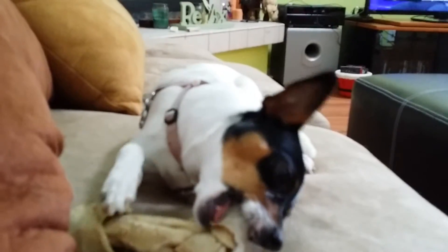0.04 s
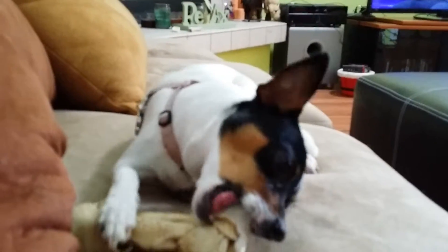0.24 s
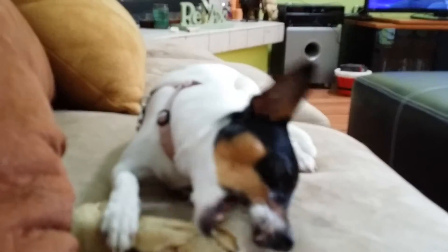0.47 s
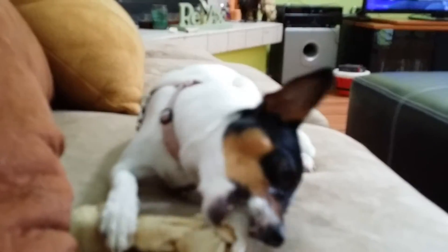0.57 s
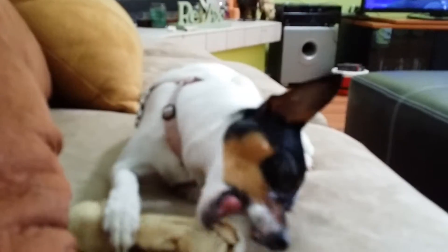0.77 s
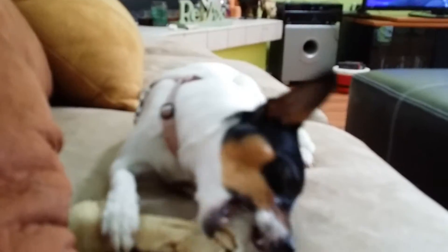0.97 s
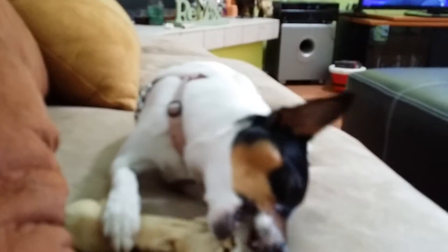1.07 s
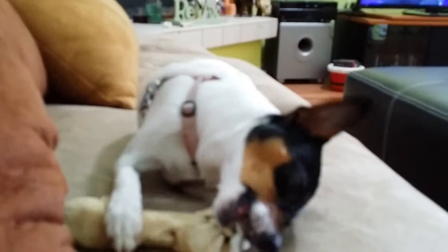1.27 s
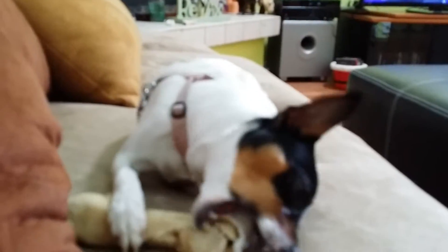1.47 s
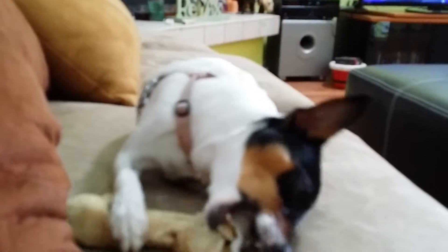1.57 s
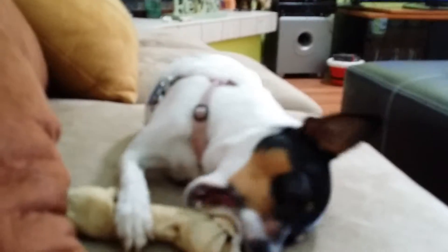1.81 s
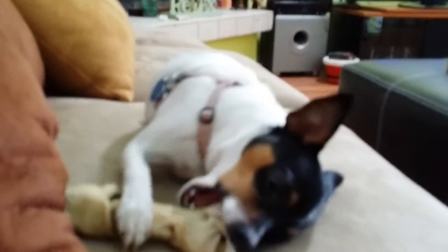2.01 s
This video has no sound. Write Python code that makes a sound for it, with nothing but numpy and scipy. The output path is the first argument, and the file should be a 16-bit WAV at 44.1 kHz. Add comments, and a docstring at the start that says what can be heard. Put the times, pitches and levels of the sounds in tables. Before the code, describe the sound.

A small dog gnaws rawhide close by in a quiet furnished room; harness metal pings early, a sniff-like hiss puffs, crunches cluster around half a second and one second, then only sparse faint ticks.

```python
"""Teeth crack and tick on a rawhide bone as a small dog gnaws it on a sofa, close by and a little right.
Cracks ring short modes of hide and mouth; hard bites add hollow knocks and lips add thin clicks.
Jaw and tongue make soft bumps that fall in pitch; filtered noise and low thuds make the cushion rumble.
A dry hiss, probably the dog's sniffing nose, swells and fades; harness fittings clink as decaying tones
and narrow noise. Chewing excites a short room tail; quiet room air and a low hum lie beneath."""
import sys
import numpy as np
from scipy import signal
from scipy.fft import rfft, irfft
from scipy.io import wavfile

SR = 44100
rng = np.random.default_rng(int(sys.argv[2]) if len(sys.argv) > 2 else 0)


def to_wav(sig):
    """Store sig (one row per channel, or 1-D mono) as 16-bit WAV at the path in sys.argv[1].

    Samples outside -1..1 are clipped; the rate is SR.
    """
    pcm = np.clip(np.atleast_2d(sig), -1, 1) * 32767
    pcm = np.round(pcm).astype(np.int16)
    wavfile.write(sys.argv[1], SR, pcm.T)  # frames by channels


N = 90404
TIME = np.arange(N) / SR

# Every *_PAN_DB is the left level over the right; every *_ALIKE is the left-right correlation.
# Every spectrum gives relative levels: (frequency [Hz], level [dB]).

# teeth on the hide, before the group trims:
# (time [s], level around 3 kHz [dB], level around 6 kHz [dB], level around 11 kHz [dB])
CRACKS = [(0.3174, -71, -45, -36), (0.3509, -57, -46, -39.5), (0.4725, -54, -39, -58),
          (0.474, -54, -44.5, -53), (0.4907, -48, -46, -48), (0.5087, -46, -45, -54),
          (0.5497, -38, -42, -65), (0.5542, -45.5, -42, -63), (0.558, -41.5, -55, -47.5),
          (0.733, -49, -35, -47.5), (0.7935, -44, -47, -49), (0.8124, -49.5, -60, -48),
          (0.9309, -37, -33, -36), (0.9908, -42, -53, -48), (1.0182, -36, -44.5, -62),
          (1.064, -31.5, -39, -39), (1.0683, -32, -36.5, -34), (1.0736, -47, -35, -46),
          (1.078, -30.5, -33, -38), (1.097, -44, -58, -70), (1.1169, -47, -37, -50),
          (1.1213, -35.5, -36.5, -48), (1.126, -47, -51, -46), (1.2483, -52.5, -69, -50),
          (1.27, -50, -59, -69), (1.276, -61, -65, -62), (1.284, -57, -56, -66), (1.377, -54, -49.5, -60),
          (1.5616, -54.5, -53.5, -59.5), (1.575, -51, -65, -77), (1.664, -49.5, -65, -68),
          (1.723, -54, -66, -57.5), (1.732, -57, -58, -56.5), (1.8283, -56, -78, -63.5),
          (2.0073, -40, -40, -47.5), (2.0134, -45, -51, -70)]
# resonances of the hide, one group per crack level, lowest mode first:
# (frequency [Hz], 60 dB decay [s], relative left level [dB], relative right level [dB])
HIDE_MODES = [
    [(2560, 0.0037, -6, -2), (2840, 0.0073, -17, -17), (3460, 0.0035, -21, 3)],
    [(4660, 0.002, -22, 9), (6000, 0.0034, 1, 4), (7010, 0.0025, -5, 8)],
    [(8190, 0.0019, 2, 7), (10700, 0.0021, -12.5, 2), (12770, 0.0054, -19, -8)],
]
# trim of each group of hide modes: (level [dB])
GROUP_TRIMS = [-0.5, 1, 2.5]
HIT_LEVEL_S = 0.004  # cracks, knocks and smacks carry the energy of their rms level held this long
SKIRT_SHARE = 0.9  # high-pass of a group, as a share of its lowest mode
DETUNE = 0.02  # greatest random shift of a mode, as a share of its frequency
SPLINTER_FADE_S, SPLINTER_DB, SPLINTERS_PER_S = 0.0018, -5, 5000  # level relative to the snap

# hard bites that ring the mouth: (time [s], level [dB], frequency [Hz])
KNOCKS = [(0.35, -52, 1900), (0.455, -54, 1620), (0.474, -51.5, 1650), (0.509, -45, 1576),
          (0.538, -46, 1500), (0.5491, -43.5, 1520), (0.5578, -44, 924), (0.7937, -47, 1900),
          (0.8871, -51, 1670), (0.9302, -44.5, 1650), (1.0179, -39, 1586), (1.0646, -47.5, 1750),
          (1.0689, -42.5, 1590), (1.078, -40.5, 1624), (1.1215, -39.5, 1930), (1.1267, -50, 904),
          (1.5626, -52.5, 915), (1.5753, -50.5, 1910), (2.0086, -44.5, 1765), (2.013, -45, 1920)]
KNOCK_CYCLES, KNOCK_PAN_DB = 34, -1.5  # cycles until the ring is 60 dB down
BONE_HZ, BONE_DB = 998, -17.5  # the whole bone sounds along; level relative to the mouth
SNAP_CYCLES, SNAP_DB = 6, -6  # the dull start of a knock; level relative to the mouth

# faint wet ticks; level relative to the cushion's rumble
TICKS_PER_S, TICK_DB, TICK_SPREAD_DB = 79, -9.5, 3

# wet lips part: (time [s], level [dB])
SMACKS = [(0.0167, -46.5), (0.737, -40), (0.8183, -45), (1.287, -52), (1.5036, -49), (1.671, -52),
          (1.6793, -54), (1.737, -50.5)]
SMACK_HZ, SMACK_T60_S, SMACK_PAN_DB = 12500, 0.00068, -7.5

# jaw and tongue bumps: (time [s], level before trim [dB], starting pitch [Hz])
BUMPS = [(0.156, -49.5, 664), (0.177, -47, 715), (0.2115, -40, 652), (0.271, -44, 560), (0.3, -46, 566),
         (0.373, -42.5, 284), (0.409, -41, 258), (0.4552, -39.5, 330), (0.477, -44, 308),
         (0.4899, -43.5, 285), (0.509, -39, 258), (0.5542, -41, 320), (0.7432, -42.5, 203),
         (0.794, -40.5, 277), (0.8484, -39, 296), (0.8691, -42, 215), (0.9334, -44, 380), (0.961, -40, 340),
         (1.0657, -35.5, 425), (1.083, -43, 325), (1.0968, -39.5, 435), (1.1208, -36.5, 316),
         (1.2977, -44, 232), (1.4838, -41.5, 450), (1.5738, -42, 270), (2.0121, -43.5, 298)]
BUMP_TRIM_DB, BUMP_PAN_DB, BUMP_END_HZ = 5, -4.5, 120.7
BUMP_FALL_S, BUMP_ATTACK_S, BUMP_DECAY_S = 0.0046, 0.0015, 0.0062  # time constants

# the bone rocks against the cushion: (time [s], level [dB], frequency [Hz])
THUDS = [(0.379, -43, 73), (0.492, -41, 124.4), (0.541, -36.5, 230), (1.558, -61, 74.4)]
THUD_CYCLES = 4.43  # length of a thud
# level of the cushion's rumble: (time [s], level [dB])
RUMBLE_LEVEL = [(0, -70), (.12, -59.5), (.35, -55), (.41, -54.5), (.55, -43), (.59, -62.5), (.7, -62),
                (.85, -55.5), (1.0, -55.5), (1.13, -48.5), (1.21, -64.5), (1.6, -58.5), (1.66, -62.5),
                (1.85, -67.5), (1.96, -60), (2.05, -58)]
# spectrum of the cushion's rumble: (frequency [Hz], level [dB])
RUMBLE_SPECTRUM = [(30, -19), (45, -11), (68, 1.5), (95, 1), (125, 0), (220, -6.5), (350, -12.5),
                   (600, -22.5), (3000, -30.5)]
RUMBLE_PAN_DB, RUMBLE_ALIKE = -4, 0.94

# level of the dry hiss, probably the sniffing nose: (time [s], level [dB])
HISS_LEVEL = [(0, -61), (.025, -50), (.12, -59.5), (.21, -58), (.26, -49), (.45, -53), (.585, -58),
              (.598, -65), (.602, -46.5), (.632, -38.5), (.69, -42.5), (.8, -50.5), (1.0, -55.5),
              (1.14, -52.5), (1.22, -66), (1.45, -79), (2.05, -84)]
# spectrum of the dry hiss: (frequency [Hz], level [dB])
HISS_SPECTRUM = [(300, -11.5), (800, -16.5), (1300, -12.5), (2000, -12), (3200, -6.5), (4800, 0),
                 (6500, -0.5), (8500, -7.5), (12000, -11), (14300, -20), (15200, -48)]
HISS_PAN_DB, HISS_ALIKE = -6.5, 0.022

# harness clinks: (time [s], level of the main rings [dB], level of the side rings [dB])
CLINKS = [(0.237, -28.5, -50), (0.261, -25.5, -62), (.4195, -37.5, -45.5), (.6295, -33.5, -42.5),
          (.853, -64, -48), (1.124, -58, -53)]
# main resonances of the metal: (frequency [Hz], relative level [dB], width [Hz])
MAIN_RINGS = [(5984, -20, 22), (10205, 0, 160)]
# side resonances of the metal: (frequency [Hz], relative level [dB], width [Hz])
SIDE_RINGS = [(6440, -7, 60), (11490, 0, 40)]
# spectrum of the bright shimmer: (frequency [Hz], level [dB])
SHIMMER_SPECTRUM = [(2000, -44), (4000, -5), (6000, -8), (9300, -0.5), (10200, 3), (11200, -3), (14300, -3),
                    (15300, -43)]
CLINK_T60_S, CLINK_PAN_DB = 0.085, -9.5
LINGER_DB, LINGER_T60_S = -6.5, 0.43  # level relative to the ping
SHIMMER_DB, SHIMMER_T60_S = -17, 0.33  # level relative to the main rings

# spectrum of the room's tail: (frequency [Hz], level [dB])
ROOM_SPECTRUM = [(100, -13), (3000, 2), (15000, 18)]
ROOM_DB, ROOM_T60_S, ROOM_DELAY_S = -23.5, 0.1, 0.0075

# spectrum of the quiet room air: (frequency [Hz], level [dB])
AIR_SPECTRUM = [(26, -13), (45, -10), (197, -3), (447, -7.5), (1120, -21.5), (1950, -15), (7020, -13),
                (14500, -25.5), (15300, -43)]
AIR_DB, AIR_PAN_DB, AIR_ALIKE = -63, -1, 0.2
HUM_HZ, HUM_DB = 107.9, -65.5

LEFT_LAG_S, LOW_CUT_HZ, HIGH_CUT_HZ = 0.00008, 57, 15600


def crack(levels_db, size=1024):
    """One snap and a dying spray of splinters ring the modes of hide and mouth."""
    t, out = TIME[:size], 0
    for modes, db, trim_db in zip(HIDE_MODES, levels_db, GROUP_TRIMS):
        splinters = (rng.random(size) < SPLINTERS_PER_S / SR) * rng.standard_normal(size)
        force = from_db(SPLINTER_DB) * splinters * np.exp(-t / SPLINTER_FADE_S)
        force[0] = 1  # the snap
        body = 0
        for hz, t60, left_db, right_db in modes:
            detuned_hz = hz * (1 + DETUNE * rng.uniform(-1, 1))
            ring = np.sin(2 * np.pi * detuned_hz * t) * dying(t60, size)
            body = body + rng.choice([-1, 1]) * from_db([[left_db], [right_db]]) * ring
        # the force strikes the body: convolution
        struck = irfft(rfft(body, 2 * size) * rfft(force, 2 * size))[:, :size]
        skirt_hz = np.clip(SKIRT_SHARE * modes[0][0], 50, SR / 3)
        sound = signal.lfilter(*signal.butter(2, skirt_hz, "high", fs=SR), struck)
        out = out + from_db(db + trim_db) * hit_level(sound)
    return out


def knock(db, hz, size=2048):
    """A hard bite snaps, then rings the mouth at one pitch and, more faintly, the bone."""
    mouth, snap = (hz, 0, KNOCK_CYCLES), (hz, SNAP_DB, SNAP_CYCLES)
    bone = (BONE_HZ, BONE_DB, KNOCK_CYCLES)
    sound = 0
    for part_hz, part_db, cycles in (mouth, snap, bone):
        tone = np.sin(2 * np.pi * part_hz * TIME[:size])
        sound = sound + from_db(part_db) * dying(cycles / part_hz, size) * tone
    return from_db(db) * hit_level(sound) * pan(KNOCK_PAN_DB)


def teeth():
    """The clear cracks of teeth on the hide and the hollow knocks of hard bites."""
    out = np.zeros((2, N))
    for s, *levels_db in CRACKS:
        add(out, s, crack(levels_db))
    for s, db, hz in KNOCKS:
        add(out, s, knock(db, hz))
    return out


def ticks(count=180):
    """Saliva and loose fibres tick at random and stir the mouth, following the cushion's rumble in level."""
    out = np.zeros((2, N))
    for s in np.cumsum(rng.exponential(1 / TICKS_PER_S, count)):
        rumble_db = np.interp(s, *np.transpose(RUMBLE_LEVEL))
        db = rumble_db + TICK_DB + TICK_SPREAD_DB * rng.normal()
        tick = crack(db + TICK_SPREAD_DB * rng.standard_normal(len(HIDE_MODES)))
        hollow = knock(db, rng.uniform(BONE_HZ, 2 * BONE_HZ))
        if s < TIME[-1]:
            add(out, s, tick)
            add(out, s, hollow)
    return out


def lips():
    """Films of saliva burst with a very short, very high click."""
    out = np.zeros(N)
    click = hit_level(dying(SMACK_T60_S) * np.sin(2 * np.pi * SMACK_HZ * TIME))
    for s, db in SMACKS:
        add(out, s, from_db(db) * click)
    return out * pan(SMACK_PAN_DB)


def jaw(size=3000):
    """Each bump of jaw or tongue is a few damped cycles that fall quickly in pitch."""
    out, t = np.zeros(N), TIME[:size]
    for s, db, start_hz in BUMPS:
        hz = BUMP_END_HZ + (start_hz - BUMP_END_HZ) * np.exp(-t / BUMP_FALL_S)
        shape = (1 - np.exp(-t / BUMP_ATTACK_S)) * np.exp(-t / BUMP_DECAY_S)
        tone = np.sin(2 * np.pi * np.cumsum(hz) / SR)
        add(out, s, from_db(db + BUMP_TRIM_DB) * shape * tone)
    return out * pan(BUMP_PAN_DB)


def rocking():
    """Each push of the bone into the cushion swells and fades within a few low cycles."""
    out = np.zeros(N)
    for s, db, hz in THUDS:
        swell = np.sin(np.pi * np.minimum(hz * TIME / THUD_CYCLES, 1)) ** 2
        add(out, s, from_db(db) * swell * np.sin(2 * np.pi * hz * TIME))
    return out * pan(RUMBLE_PAN_DB)


def nose_and_cushion():
    """Coloured noises for the dry hiss, probably a sniff, and the cushion's rumble follow level curves."""
    hiss = level(HISS_LEVEL) * noise(HISS_SPECTRUM, HISS_ALIKE) * pan(HISS_PAN_DB)
    rumble = level(RUMBLE_LEVEL) * noise(RUMBLE_SPECTRUM, RUMBLE_ALIKE) * pan(RUMBLE_PAN_DB)
    return hiss + rumble


def wavering(hz, width_hz):
    """A rough, beating tone: stereo noise in one narrow resonance; rms 1."""
    offset = 2 * (np.fft.rfftfreq(N, 1 / SR) - hz) / width_hz
    gain = 1 / (1 + offset ** 2) ** 0.75
    return rms_one(irfft(rfft(rng.standard_normal((2, N))) * gain, N))


def tails(times, levels_db, t60):
    """Gain of the overlapping clink tails, summed in power."""
    power = np.zeros(N)
    for s, db in zip(times, levels_db):
        add(power, s, (from_db(db) * dying(t60)) ** 2)
    return np.sqrt(power)


def harness():
    """Small metal parts touch: a short clear ping, a rough ring that lingers and a bright shimmer."""
    out = np.zeros((2, N))
    ear_phase = np.array([[np.pi / 2], [0]])  # the left ping leads by a quarter cycle
    times, main_db, side_db = np.transpose(CLINKS)
    for modes, levels_db in ((MAIN_RINGS, main_db), (SIDE_RINGS, side_db)):
        for hz, mode_db, width_hz in modes:
            tone = np.sqrt(2) * np.sin(2 * np.pi * hz * TIME + ear_phase)  # rms 1
            ping = dying(CLINK_T60_S) * tone
            for s, db in zip(times, levels_db):
                add(out, s, from_db(db + mode_db) * ping)
            linger = tails(times, levels_db + mode_db + LINGER_DB, LINGER_T60_S)
            out += linger * wavering(hz, width_hz)
    shimmer = tails(times, main_db + SHIMMER_DB, SHIMMER_T60_S) * noise(SHIMMER_SPECTRUM, 0)
    return (out + shimmer) * pan(CLINK_PAN_DB)


def room(x):
    """The short tail of a furnished room: convolution with delayed, decaying noise."""
    tail = noise(ROOM_SPECTRUM, 0.1) * dying(ROOM_T60_S) * (TIME > ROOM_DELAY_S)
    tail = rms_one(tail) / np.sqrt(N)  # unit energy per channel on average
    return from_db(ROOM_DB) * signal.fftconvolve(x, tail, axes=1)[:, :N]


def background():
    """Quiet room air as steady coloured noise, with a low sine hum."""
    air = from_db(AIR_DB) * noise(AIR_SPECTRUM, AIR_ALIKE) * pan(AIR_PAN_DB)
    hum = from_db(HUM_DB) * np.sin(2 * np.pi * HUM_HZ * TIME)
    return air + hum


def from_db(db):
    """Amplitude gain of a level in dB."""
    return 10 ** (np.asarray(db) / 20)


def rms_one(x):
    """Scale a sound to rms 1."""
    return x / np.sqrt(np.mean(x ** 2) + 1e-20)


def hit_level(sound):
    """Scale a short sound to the energy of rms 1 held for HIT_LEVEL_S."""
    return rms_one(sound) * np.sqrt(HIT_LEVEL_S * SR / sound.shape[-1])


def dying(t60, size=N):
    """A fall of 60 dB in t60 seconds."""
    return np.exp(-np.log(1000) * TIME[:size] / t60)


def pan(db):
    """Gains of left and right for a level difference; their mean is 1."""
    gains = from_db(np.array([[db], [-db]]) / 2)
    return gains / gains.mean()


def level(rows):
    """Gain along a curve of (time [s], level [dB])."""
    return from_db(np.interp(TIME, *np.transpose(rows)))


def add(out, s, sound):
    """Mix a sound in at a time in seconds."""
    i = int(np.clip(s * SR, 0, N - 1))
    out[..., i:i + sound.shape[-1]] += sound[..., :N - i]


def noise(spectrum, alike):
    """Stereo noise of a given colour and left-right correlation; rms 1."""
    hz, db = np.transpose(spectrum)
    bins_hz = np.fft.rfftfreq(N, 1 / SR) + 1  # keeps the logarithm finite
    gain = from_db(np.interp(np.log(bins_hz), np.log(hz), db))
    mid, side = irfft(rfft(rng.standard_normal((2, N))) * gain, N)
    c = np.clip(alike, -1, 1)
    return rms_one(np.sqrt(1 + c) * mid + np.sqrt(1 - c) * side * np.array([[1], [-1]]))


def from_right(x):
    """The sound reaches the left microphone a little later."""
    return np.array([np.interp(TIME - LEFT_LAG_S, TIME, x[0]), x[1]])


def scene():
    """The dog close by, in a quiet room."""
    chewing = teeth() + lips() + jaw() + ticks()
    dog = from_right(chewing + rocking() + nose_and_cushion())
    return dog + harness() + room(chewing) + background()


def record(dry):
    """Cut the deepest bass gently and the top steeply."""
    low_cut = signal.butter(2, LOW_CUT_HZ, "high", fs=SR, output="sos")
    high_cut = signal.butter(16, HIGH_CUT_HZ, fs=SR, output="sos")
    return signal.sosfiltfilt(high_cut, signal.sosfilt(low_cut, dry))


dry = scene()
out = record(dry)
to_wav(out)
```